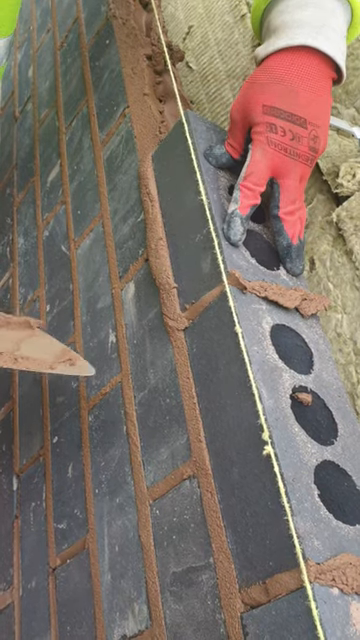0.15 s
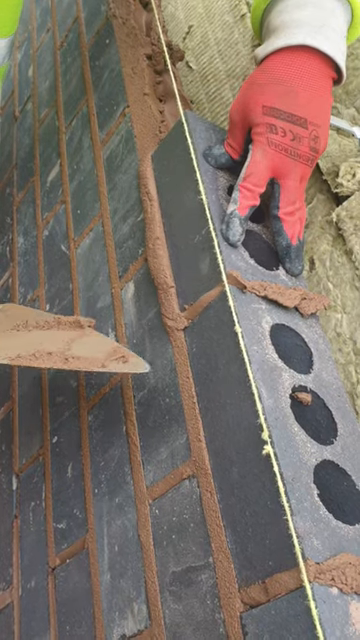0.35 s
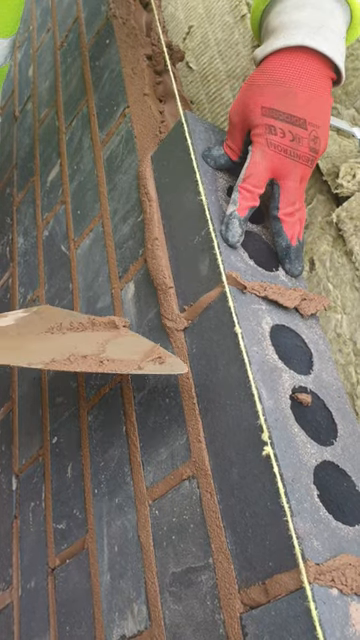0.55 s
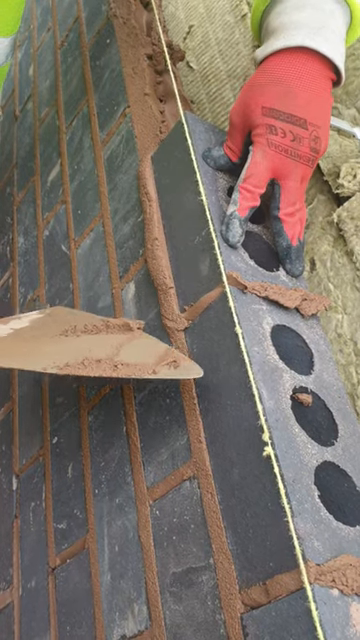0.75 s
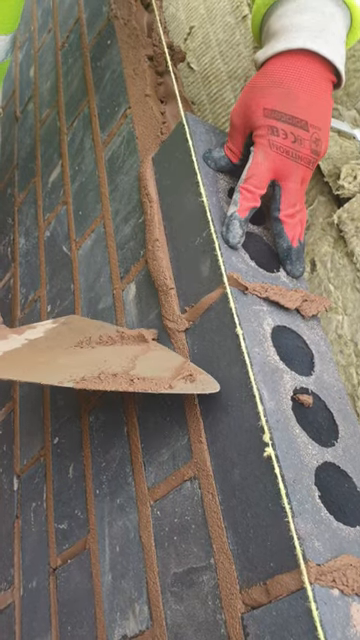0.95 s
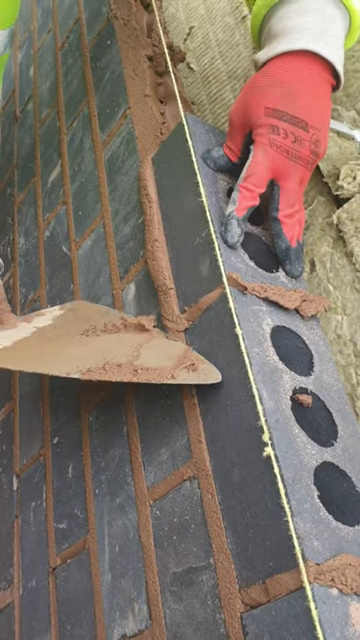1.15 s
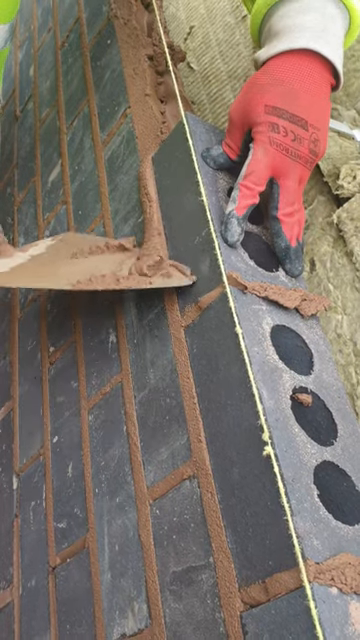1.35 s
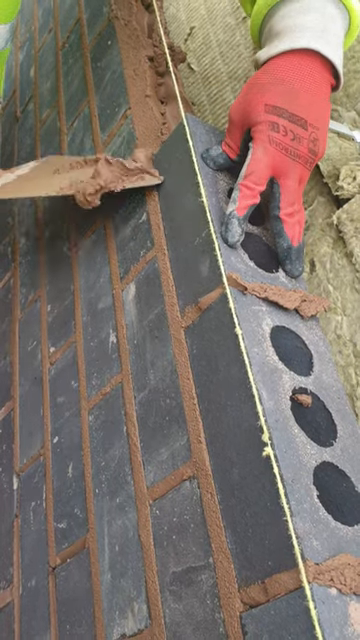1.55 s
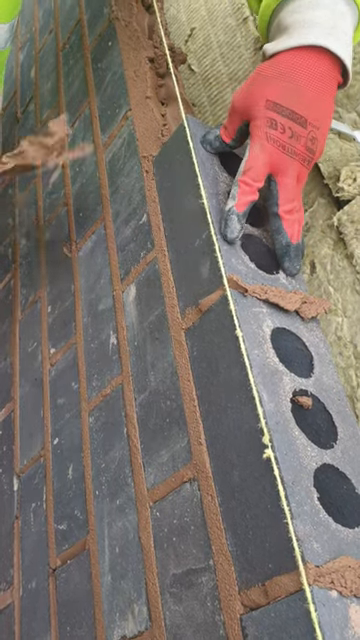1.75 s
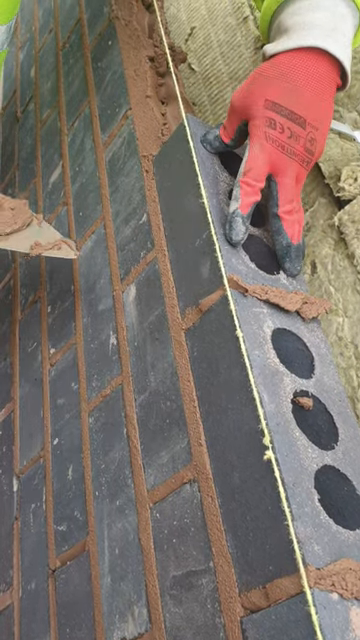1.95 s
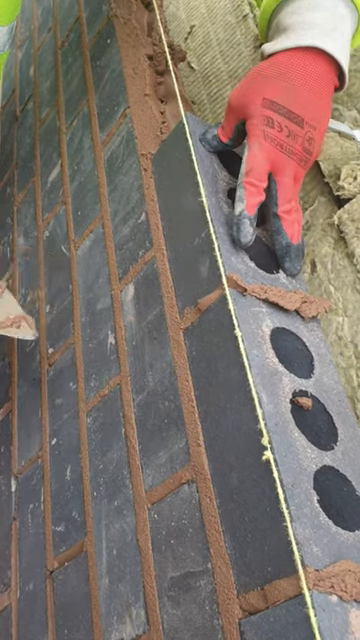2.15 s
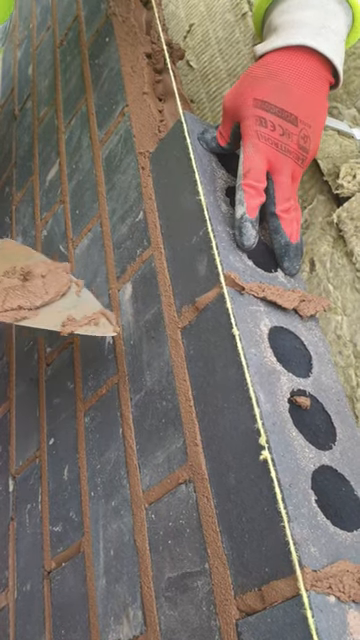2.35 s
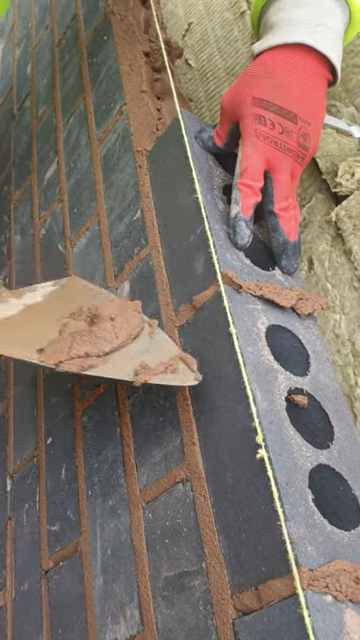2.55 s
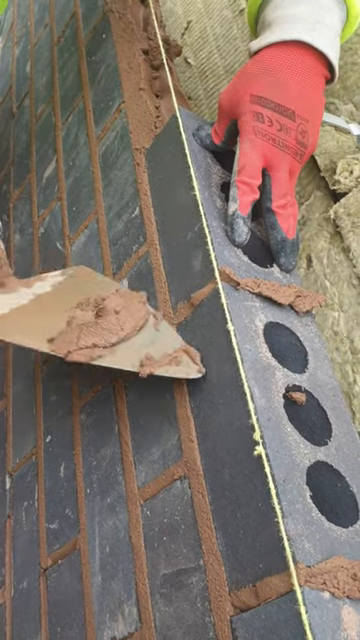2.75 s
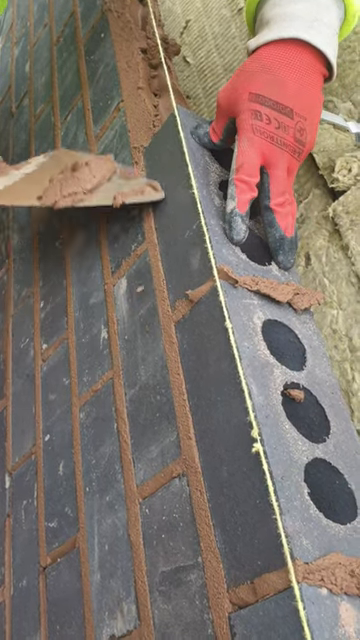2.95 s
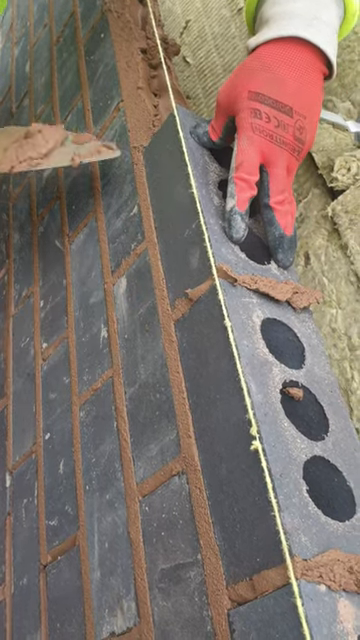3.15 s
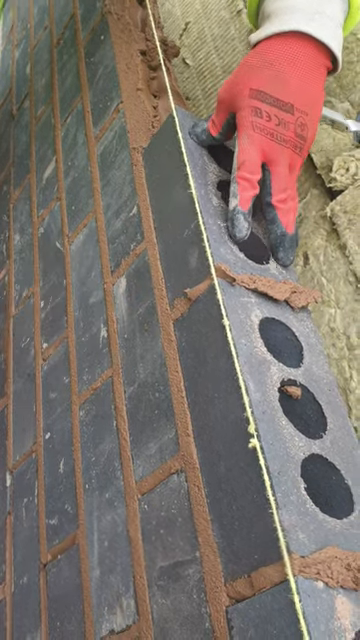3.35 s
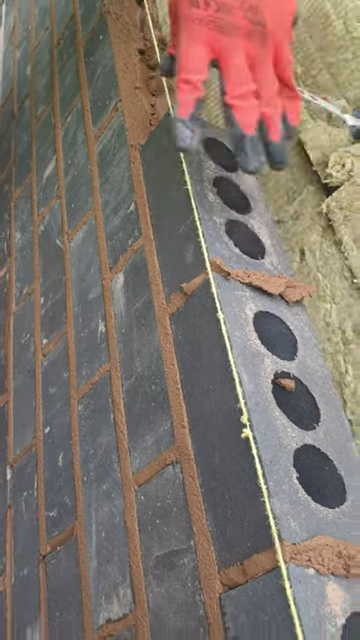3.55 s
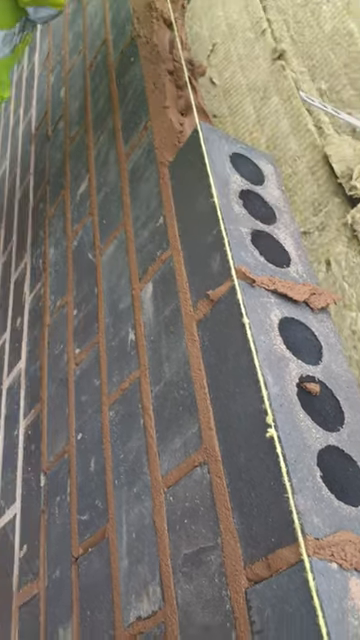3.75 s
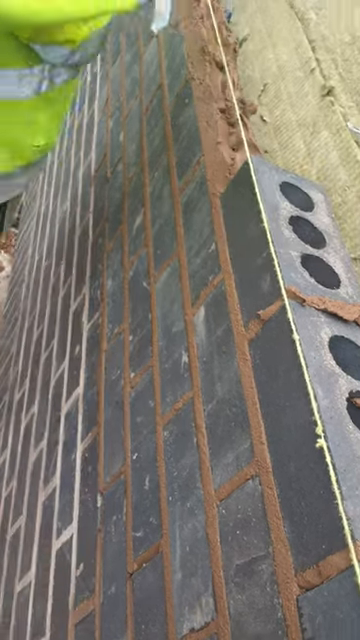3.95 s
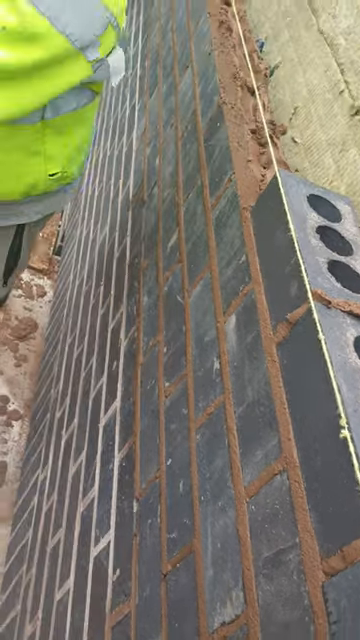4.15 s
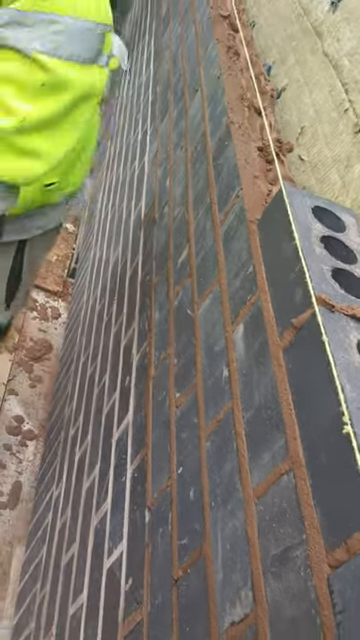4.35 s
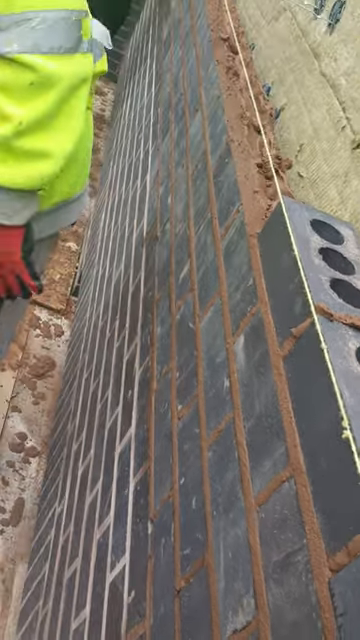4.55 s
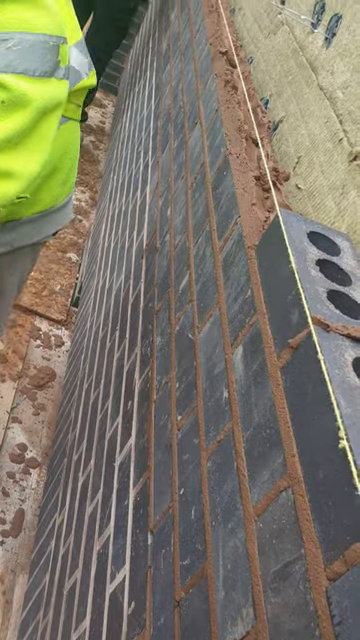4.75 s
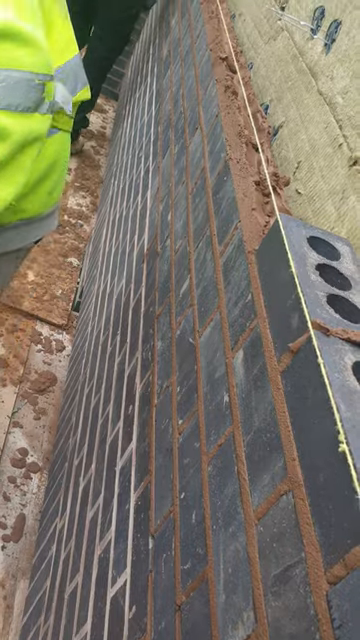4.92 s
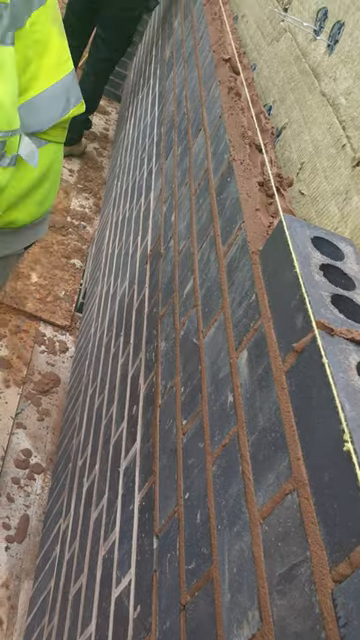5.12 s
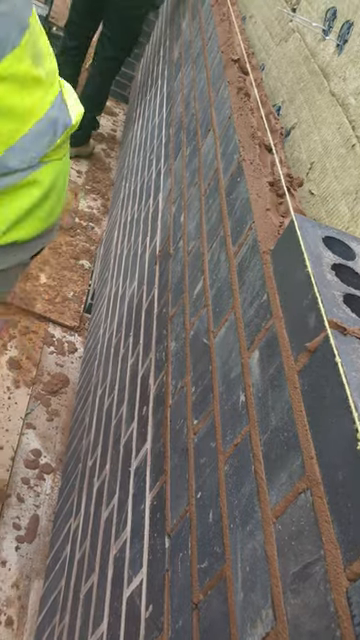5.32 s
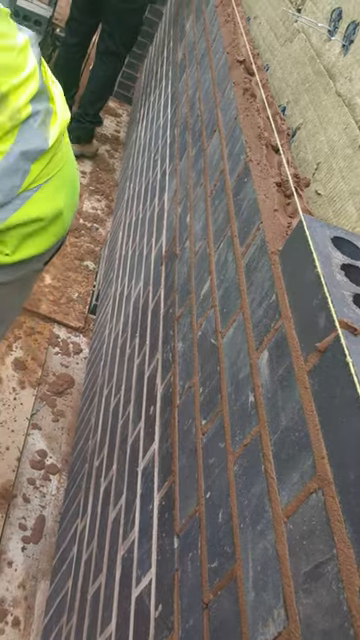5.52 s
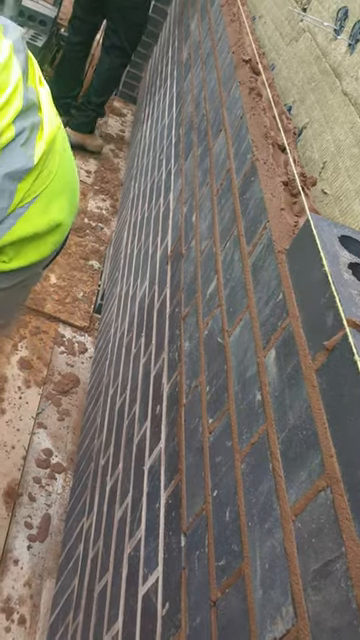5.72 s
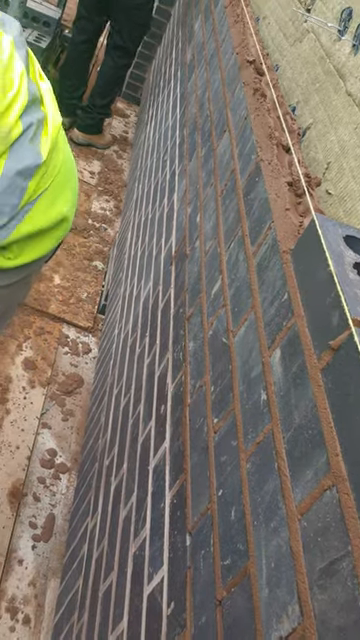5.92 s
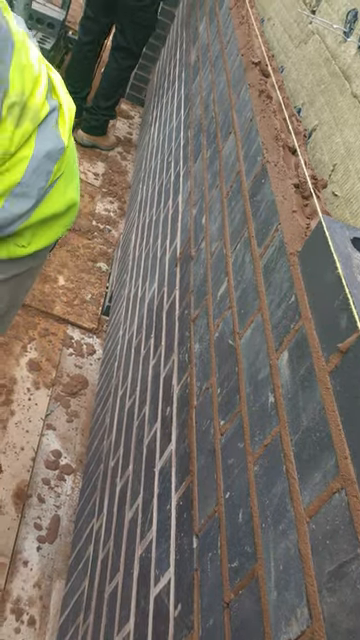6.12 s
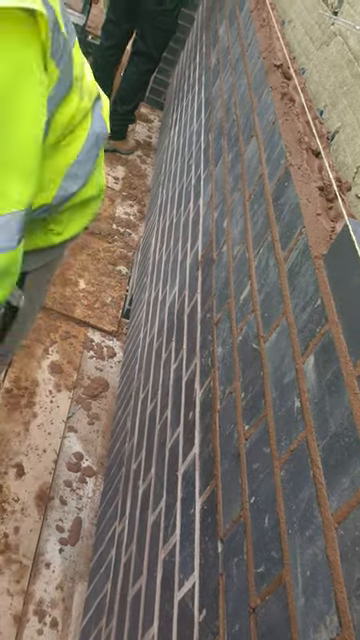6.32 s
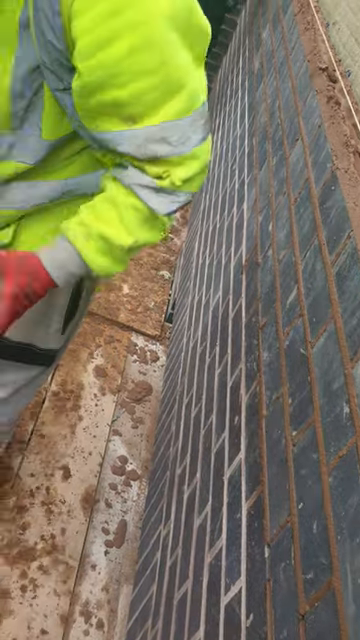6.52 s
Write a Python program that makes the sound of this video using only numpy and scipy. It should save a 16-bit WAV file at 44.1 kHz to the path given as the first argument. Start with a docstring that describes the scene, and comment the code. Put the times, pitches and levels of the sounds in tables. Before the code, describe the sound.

Close bricklaying: a dull knock, wet sandy smears, two bright gritty blade scrapes, then small taps, rustling clothes and boot scuffs over machinery rumble.

```python
"""Cutting mortar with a trowel

A bricklayer cuts squeezed-out mortar off a wall with a steel trowel, heard from close by.
The blade knocks, catches, smears wet mortar and scrapes twice along the brick: shaped noise and resonances.
Crumbs tap with short rings; cloth, grit and boots are shaped noise; squeaks and squeals are unsteady tones.
Site machinery rumbles behind with three low engine notes and filtered noise."""
import sys
import numpy as np
from scipy import signal
from scipy.fft import rfft, irfft
from scipy.io import wavfile
from scipy.ndimage import uniform_filter1d

SR = 44100
rng = np.random.default_rng(int(sys.argv[2]) if len(sys.argv) > 2 else 0)


def to_wav(s):
    """Save 16-bit WAV."""
    ch = np.atleast_2d(s).T  # columns
    pcm = np.round(np.clip(ch, -1, 1) * 32767)  # PCM
    wavfile.write(sys.argv[1], SR, pcm.astype(np.int16))


N = 290178
TIME = np.arange(N) / SR
SHORT_TIME = np.arange(SR // 4) / SR  # a quarter second, for single hits


def amp(db):
    """Turns decibels into a gain."""
    return 10 ** (np.asarray(db) / 20)


def unit(x):
    """Scales a sound to rms 1."""
    return x / np.sqrt(np.mean(x ** 2) + 1e-20)


def add(mix, start, sound):
    """Mixes a sound in at a start time in seconds."""
    part = mix[max(round(start * SR), 0):][:len(sound)]
    part += sound[:len(part)]


def colour(x, points, size=8192):
    """Filters one or two channels to the given (Hz, dB) outline, with no sound ahead of its cause."""
    hz, db = np.transpose(points)
    bins_hz = abs(np.fft.fftfreq(size, 1 / SR))
    outline_db = np.interp(np.log(bins_hz + 1), np.log(hz), db)
    log_gain = np.log(amp(outline_db))
    # minimum phase
    taps = np.fft.ifft(np.exp(np.conj(signal.hilbert(log_gain)))).real[:size // 2]
    return signal.oaconvolve(x, np.array(taps, ndmin=x.ndim), axes=-1)[..., :x.shape[-1]]


def wander(rate):
    """Smooth random curve of rms 1 that changes about rate times a second."""
    hz = np.fft.rfftfreq(N, 1 / SR)
    slow = rfft(rng.standard_normal(N)) * np.exp(-(hz / rate) ** 2)
    return unit(irfft(slow, N))


def grains(per_s, spread_db, smooth, likeness=0.38):
    """Sand grains crack: uneven clicks over a finer bed, each radiating its own way, so the ports differ."""
    size = amp(spread_db * np.minimum(rng.exponential(1, N), 4))
    size = size * (rng.random(N) < per_s / SR)
    clicks = unit(size * rng.choice([-1, 1], (2, N)))
    left, other = clicks + smooth * rng.standard_normal((2, N))
    # long waves reach both ports alike
    other = signal.lfilter(*signal.butter(1, 450, "high", fs=SR), other)
    right = likeness * left + np.sqrt(1 - likeness ** 2) * other
    return unit(np.array([left, right]))


def burst(t60):
    """A dying crackle of peak size about 1; t60 is the time in seconds to fall by 60 dB."""
    return rng.uniform(-1.01, 1, len(SHORT_TIME)) * amp(-60 * SHORT_TIME / max(t60, .002))


def place(x, echo_db, t60, shade_db, lead_s=.0002):
    """Wall and boards scatter sound to each port; the right hears it later, its treble shaded."""
    ports = []
    for sound, delay in zip(np.broadcast_to(x, (2, N)), (0, round(lead_s * SR))):
        # sparse random echoes after the first half millisecond
        taps = burst(t60) * (rng.random(len(SHORT_TIME)) < .15) * (SHORT_TIME > .0005)
        taps *= amp(echo_db) / np.linalg.norm(taps)
        taps[delay] += 1  # direct sound
        ports.append(signal.oaconvolve(sound, taps / np.linalg.norm(taps))[:N])
    shade = [(2700, 0.003), (3500, shade_db), (8000, shade_db), (12000, 0)]
    return np.array([ports[0], colour(ports[1], shade)])


def stroke(start, top, end, build_db, ease_db):
    """Gain of one arch of pressure: the blade lands, bears down, eases off and lifts."""
    land_s, lift_s, arch_power = 0.0014, 0.01, 2.14
    before = np.clip((top - TIME) / max(top - start, .001), 0, 1)
    after = np.clip((TIME - top) / max(end - top, .001), 0, 1)
    landed = np.clip((TIME - start) / land_s, 0, 1)
    not_lifted = np.clip(1 - (TIME - end) / lift_s, 0, 1)
    return landed * not_lifted * amp(-build_db * before ** arch_power - ease_db * after ** arch_power)


def swells(rows):
    """Gain over time of movements that each swell and fade evenly."""
    gain = np.zeros(N)
    for start, length, db in rows:
        add(gain, start, amp(db) * np.hanning(round(length * SR)))
    return gain


# Low engine notes. Each row: pitch in Hz, relative level in dB.
ENGINE_NOTES = [(40, -8), (56.5, -10), (70.8, -5.5)]
# Tone colour of the low rumble. Each row: frequency in Hz, relative level in dB.
RUMBLE_COLOUR = [(15, -34), (30, -32), (42, 0), (62, 0), (80, -3), (100, -4.5), (114, -9.5), (132, -6.5),
                 (170, -22), (300, -31), (700, -79)]
# Tone colour of the site noise. Each row: frequency in Hz, relative level in dB.
SITE_COLOUR = [(60, -16), (180, 0), (260, 0.5), (345, 3), (450, -1.5), (600, -2.5), (900, -7.5),
               (1300, -9.5), (2100, -9), (3300, -14), (6000, -21), (9000, -25), (12000, -30), (16000, -25)]
# How loud the background is over time; it grows towards the end.
# Each row: time in seconds, relative level of the rumble in dB, relative level of the site noise in dB.
BACKGROUND_LEVELS = [(0, -34, -43), (0.5, -36.5, -47), (1.1, -34.5, -44.5), (1.9, -37.5, -49),
                     (2.5, -37, -51), (3.3, -37.5, -49.5), (4.0, -36.5, -47.5), (4.4, -39, -50.7),
                     (5.1, -37.0, -50), (5.5, -34.5, -46.3), (6.1, -33, -42.5), (6.58, -30.5, -41.5)]


def machinery():
    """Unsteady engine notes in a rumble nearly alike at both ports, under the diffuse noise of the site."""
    notes = np.zeros(N)
    for hz, db in ENGINE_NOTES:
        unsteady_hz = hz * (1 + 0.01206 * wander(3.35))
        notes += amp(db) * np.sqrt(2) * np.sin(2 * np.pi * np.cumsum(unsteady_hz) / SR)
    roar = rng.standard_normal(N) + amp(-15.5) * rng.standard_normal((2, N))
    roar = unit(colour(roar, RUMBLE_COLOUR))
    times, rumble_db, site_db = np.transpose(BACKGROUND_LEVELS)
    rumble = amp(-2.0) * notes + amp(-2.5) * roar
    rumble = rumble * amp(-3 + np.interp(TIME, times, rumble_db))
    # site noise: a part shared by the ports and a part that sets them apart
    common = colour(rng.standard_normal(N), [(300, 1.0), (1000, 0.5), (2500, -2.5)])
    apart = colour(rng.standard_normal(N), [(100, -19), (350, -25.5), (1000, -8.0), (2500, -7)])
    left = colour(common + apart, SITE_COLOUR)
    right = colour(common - apart, SITE_COLOUR)
    right = colour(right, [(2700, -1.0), (3400, -12.0), (8000, -9.5), (12000, -0.5)])
    right = np.roll(right, 16)  # lags by 16 samples
    site_gain = amp(-1 + np.interp(TIME, times, site_db) + 0.23 * wander(7.4))
    return rumble + np.array([left, right]) / left.std() * site_gain


# Dull knocks on the wall and the boards.
# Each row: start in seconds, relative level in dB, pitch in Hz, time to die by 60 dB in seconds,
# level of the click against the thud in dB (before a small fixed boost of the thud).
KNOCKS_HEARD = [(0.1898, -10, 390, 0.024, -2.5), (0.8272, -36, 290, 0.21, -8),
                (1.539, -32, 238, 0.045, -10), (1.936, -27, 263, 0.075, -3), (3.882, -25, 280, 0.038, -13),
                (3.889, -26, 323, 0.073, -7), (5.986, -32, 485, 0.075, -12)]


def knocks():
    """A heavily damped low tone and its overtone, with a click at the contact."""
    out = np.zeros(N)
    click_colour = [(150, -20), (700, 13.5), (1300, -1.5), (2500, -0.5), (3500, -20), (12000, -21)]
    for start, db, hz, t60, click_db in KNOCKS_HEARD:
        turn = 2 * np.pi * hz * SHORT_TIME
        tones = np.sin(turn) + amp(-14) * np.sin(2.2 * turn)
        soft_start = 1 - np.exp(-SHORT_TIME / 0.0006)
        thud = tones * amp(-60 * SHORT_TIME / t60) * soft_start
        click = colour(burst(0.071), click_colour)
        add(out, start, amp(db) * (1.25 * thud + amp(click_db) * click))
    return place(out, echo_db=-7.5, t60=0.14, shade_db=-7)


# Tone colours of the blade in mortar. Each row: frequency in Hz, relative level in dB.
WET_SAND_COLOUR = [(1500, -29), (2600, 4.5), (4000, 2), (6000, 2.5), (8000, 1.5), (11000, -3.5),
                   (16000, -11)]
SQUELCH_COLOUR = [(400, -4), (1000, -5), (1400, -9.5), (1900, 1), (2600, -1), (3200, -12.5), (4500, -13.5)]
PUSH_COLOUR = [(80, -24), (170, -3.5), (290, 5.5), (450, 1.5), (750, -5), (1100, -8.5), (2000, -22.5)]
SWISH_SAND_COLOUR = [(1500, -21), (2600, -2), (4000, -4), (6000, -1.5), (8000, 3), (11000, 1.5), (16000, 4)]
SWISH_BODY_COLOUR = [(300, -12), (900, -2.5), (1500, -6), (2200, 4), (3500, -12), (6000, -22)]
# The blade sliding in wet mortar. Each row: start, hardest push and end in seconds,
# then the relative levels in dB of sand hiss, squelch and dull push on the wall.
SMEAR_STROKES = [(0.209, 0.32, 0.41, -38, -39.5, -32), (0.828, .89, 1, -31.5, -35.5, -41.5),
                 (1.933, 1.978, 2.014, -34.5, -38, -39.5), (2.01, 2.038, 2.11, -41, -49, -60),
                 (2.092, 2.116, 2.182, -44.5, -46, -47)]
# A quick swish of the blade further off. Each row: start, fastest moment and end in seconds,
# then the relative levels in dB of sand hiss and body. A row that ends before it starts stays silent.
SWISH_STROKES = [(4.549, 4.572, 4.594, -31.5, -36.5), (4.598, 4.64, 4.46, -47, -58),
                 (5.016, 5.028, 4.6, -50, -51)]


def smear(strokes, build_db, ease_db, sand, body, hiss_db, body_db, clump_db):
    """Wet mortar parts in clumps: fine sand hiss above a soft body."""
    clumps = amp(clump_db * wander(140))
    hiss = amp(hiss_db) * unit(colour(grains(7000, 0.93, 0.89) * clumps, sand))
    soft = grains(2000, 1.5, 0.65, likeness=0.83) * clumps
    squelch = amp(body_db) * unit(colour(soft, body))
    out = np.zeros((2, N))
    for start, top, end, sand_db, wet_db, *_ in strokes:
        pressure = stroke(start, top, end, build_db, ease_db)
        out += (amp(sand_db) * hiss + amp(wet_db) * squelch) * pressure
    return out


def mortar():
    """The blade smears wet mortar, pushing dully on the wall; later it swishes once, further off."""
    wet = smear(SMEAR_STROKES, 5.5, 16.5, WET_SAND_COLOUR, SQUELCH_COLOUR,
                hiss_db=-2.0, body_db=-1.0, clump_db=2.0)
    # the mortar gives way, so the push is strongest on landing
    sag_db_per_s = 79  # average over a stroke
    force = np.zeros(N)
    for start, _, end, _, _, push_db in SMEAR_STROKES:
        force += amp(push_db) * stroke(start, start, end, 0, sag_db_per_s * (end - start))
    push = amp(-2.5) * unit(colour(grains(700, 4.5, 0.67, likeness=0.85), PUSH_COLOUR)) * force
    swish = smear(SWISH_STROKES, 8, 17, SWISH_SAND_COLOUR, SWISH_BODY_COLOUR,
                  hiss_db=0.1, body_db=1.0, clump_db=0.5)
    near = place(wet + push, echo_db=-6.0, t60=0.035, shade_db=-7.5)
    return near + place(swish, echo_db=0.5, t60=0.15, shade_db=-4.0)


def sing(hz):
    """One note of rubbing parts, unsteady in pitch and loudness."""
    jitter = unit(uniform_filter1d(rng.standard_normal(N), size=120))
    unsteady_hz = hz * (1 + 0.0118 * jitter)
    return (1 + 0.28 * jitter) * np.sin(2 * np.pi * np.cumsum(unsteady_hz) / SR)


# Faint far-off squeals. Each row: start in seconds, length in seconds, pitch in Hz, level in dB.
FAR_SQUEALS = [(0.564, 0.14, 1664, -52), (.59, 0.15, 835, -53.5), (.68, 0.19, 990, -56),
               (4.817, 0.19, 1007, -61.5)]
# Something on the scaffold squeaks under the shifting weight.
# Each row: start in seconds, length in seconds, lowest note's level in dB, upper notes' level in dB.
SCAFFOLD_SQUEAKS = [(5.869, 0.17, -44.5, -44.5), (5.927, 0.041, -34, -51), (6.019, 0.027, -45.5, -41.5)]
# Notes of the squeaking part, lowest first. Each row: pitch in Hz, relative level in dB.
SQUEAKING_PART = [(2700, 2), (4170, 1), (6330, -17), (9200, -9), (9900, -12)]


def squeaks():
    """A rubbing part nearby sings on several notes at once; those far off on one each."""
    low = swells([(start, length, db) for start, length, db, _ in SCAFFOLD_SQUEAKS])
    upper = swells([(start, length, db) for start, length, _, db in SCAFFOLD_SQUEAKS])
    out = np.zeros(N)
    for k, (hz, db) in enumerate(SQUEAKING_PART):
        out += amp(db) * (upper if k else low) * sing(hz)
    for start, length, hz, db in FAR_SQUEALS:
        out += swells([(start, length, db)]) * sing(hz)
    return place(out, echo_db=-12, t60=0.098, shade_db=-5.5)


# Dry ticks of grit and clothing. Each row: start in seconds, relative level in dB.
GRIT_TICKS = [(0.671, -39), (3.9879, -36.5), (5.017, -37.5), (5.692, -35), (6.0255, -37), (6.2343, -28),
              (6.2647, -35), (6.4092, -37.5)]
# Glove and jacket rubbing. Each row: start in seconds, length in seconds, relative level in dB.
CLOTH_RUSTLES = [(1.79, 0.099, -57.5), (1.88, 0.062, -52), (3.35, 0.33, -46), (3.67, 0.13, -51.5),
                 (3.91, 0.11, -55.5), (4.1, .12, -55), (4.86, 0.076, -59.5), (5.45, 0.22, -53),
                 (5.66, 0.16, -50.5), (5.83, 0.29, -47.5)]
# Boots scuffing grit on the boards. Each row: start in seconds, length in seconds, level in dB.
BOOT_SCUFFS = [(4.028, 0.051, -42.5), (4.107, 0.099, -43), (5.909, 0.12, -36.5)]
# Tone colours of cloth and of boots. Each row: frequency in Hz, relative level in dB.
CLOTH_COLOUR = [(300, -4), (1000, 2), (2500, 9), (4500, 6), (6300, 4.5), (9000, 2), (12000, 0), (16000, -4)]
SCUFF_COLOUR = [(100, 3), (300, 6.5), (500, 2), (1100, 2), (2000, -13), (4000, -13.5), (9000, -32)]


def movements():
    """Cloth rubs, grit ticks and boots scuff as the bricklayer moves."""
    rubbing = grains(2500, 4.5, 1.0) * amp(3.5 * wander(47))
    rustles = unit(colour(rubbing, CLOTH_COLOUR)) * swells(CLOTH_RUSTLES)
    ticks = np.zeros(N)
    for start, db in GRIT_TICKS:
        add(ticks, start, amp(db) * burst(0.04))
    ticks = colour(ticks, [(500, -7), (3000, -0.5), (6000, 2.5), (8500, 5.5), (11000, -3.5), (16000, -6)])
    scuffs = unit(colour(grains(900, 3.1, 0.32), SCUFF_COLOUR)) * swells(BOOT_SCUFFS)
    return place(rustles + ticks + scuffs, echo_db=-7.5, t60=0.024, shade_db=-5)


# Tone colour of crushed sand, for the catches and the scrapes.
# Each row: frequency in Hz, relative level in dB.
SAND_COLOUR = [(1500, -18), (3000, -12.5), (4500, -1.5), (5800, 0.5), (8000, 3), (11000, 2.5), (16000, -3)]
# The steel edge catches and skips in an even run of slips. Each row: start in seconds,
# number of slips, gap between slips in seconds, relative levels of the first and last slip in dB.
EDGE_CATCHES = [(0.827, 1, 0, -20, -22), (1.1635, 2, .0042, -10, -21.5), (1.187, 4, .022, -12.5, -25),
                (1.307, 1, 0, -10, -11), (1.4468, 2, .004, -2.5, -16), (1.616, 1, 0, -15, -16.5),
                (1.936, 1, 0, -29, -24), (2.762, 3, .0235, -29, -19.5), (2.864, 1, 0, -21, -13),
                (2.897, 2, .0105, -13, -11), (2.951, 4, .008, -7, -18)]


def catches():
    """Hard slips of the edge: runs of short bright bursts of crushed sand."""
    out = np.zeros(N)
    for start, count, gap, first_db, last_db in EDGE_CATCHES:
        for k, db in enumerate(np.linspace(first_db, last_db, round(count))):
            add(out, start + k * gap, amp(db) * burst(t60=0.028))
    return place(amp(-4.5) * colour(out, SAND_COLOUR), echo_db=-8.5, t60=0.033, shade_db=-17)


# Ring of a tapped brick. Each row: pitch in Hz, relative level in dB, time to die by 60 dB in seconds.
BRICK_RING = [(710, -16.5, 0.088), (1036, -7.5, 0.061), (1192, 5, 0.027), (1800, -1.5, 0.024),
              (2320, 0.5, 0.029), (2990, -17, 0.025)]
# Crumbs of mortar and fingertips tapping brick. Each row: start in seconds, relative level in dB,
# relative treble in dB, pitch as a multiple of the brick's ring.
BRICK_TAPS = [(1.162, -23.5, 7.5, 0.96), (1.537, -27.5, 13, 1.06), (1.751, -23.5, 7, 0.99),
              (2.765, -25, -3, 0.83), (3.463, -22.5, 6.5, 1), (3.558, -25, 8, 0.84),
              (3.581, -24.5, 3, 1.03), (3.701, -27, 4, 0.96), (6.025, -31, 11, 1)]


def taps():
    """Small hard contacts ring the brick briefly, with a crack of noise."""
    out = np.zeros(N)
    crack_colour = [(150, 7.5), (1500, 8.0), (2600, 1.5), (5000, 0.5), (12000, -18.5)]
    for start, db, treble_db, pitch in BRICK_TAPS:
        ring = np.zeros(len(SHORT_TIME))
        for hz, ring_db, t60 in BRICK_RING:
            tap_hz = hz * pitch * rng.uniform(1.0, 1.03)
            ring += amp(ring_db - 60 * SHORT_TIME / t60) * np.sin(2 * np.pi * tap_hz * SHORT_TIME)
        crack = colour(burst(0.026), crack_colour)
        add(out, start, amp(db) * (ring / abs(ring).max() + amp(treble_db - 8.5) * crack))
    return amp(1.5) * place(out, echo_db=0, t60=0.038, shade_db=-8.0)


# The blade dragged along the brick. Each row: start, hardest push and end in seconds,
# relative levels of sand hiss and grinding in dB, build-up of pressure in dB, easing off in dB.
SCRAPE_STROKES = [(1.208, 1.455, 1.766, -24, -30, 9.5, 26.5), (2.785, 2.935, 3.137, -21, -30, 18, 20.5)]
# Tone colour of the grinding rasp. Each row: frequency in Hz, relative level in dB.
GRIND_COLOUR = [(80, -24.5), (200, -5.5), (450, -2.5), (1000, -2), (2000, -9), (3500, 0), (7000, -23.5)]
# Resonances of the blade pressed on the brick; the grip shifts their weights.
# Each row: pitch in Hz, width in Hz, relative level in dB in the first stroke, then in the second.
BLADE_RESONANCES = [(667, 105, -9.5, -3), (840, 76, 2, -2), (1180, 75, -3.5, -3.5), (1710, 157, -6.5, -6),
                    (1850, 190, -4, -9), (2210, 190, -1.5, -12), (2536, 81.5, 3, -0.5)]
# Where along the stroke each blade resonance is excited most, lowest resonance first.
# Each entry: share of the stroke, from 0 to 1.
BEST_SPOTS = [0.41, 0.083, 0.23, 0.38, 0.26, 0.45, 0.12]


def scrapes():
    """Steel sticks and slips over brick: each slip crushes sand and shakes the blade's resonances."""
    ring_follows, rasp_follows = 0.72, 0.91  # dB of each for every dB of pressure
    off_spot_db = 12.5  # loss over a whole stroke's distance from the best spot
    chatter_hz = 110 * (1 + 0.2873 * wander(67.4))  # uneven slips
    chatter = np.sin(2 * np.pi * np.cumsum(chatter_hz) / SR)
    slip = amp(2.0 * chatter + 0.64 * wander(380) + 1.0 * wander(35))
    crushed = grains(4000, 4.2, 0.26, likeness=0.49) * slip
    sand = amp(-2.5) * unit(colour(crushed, SAND_COLOUR))
    push = grains(2500, 1.64, 0.53, likeness=0.79) * slip
    rasp = amp(-4.5) * unit(colour(push, GRIND_COLOUR))
    modes = []
    for hz, width, *_ in BLADE_RESONANCES:
        mode = signal.lfilter(*signal.iirpeak(hz, hz / width, SR), push)
        modes.append(mode * amp(1.16 * wander(8.5)))
    out = np.zeros((2, N))
    for k, (start, top, end, hiss_db, grind_db, build_db, ease_db) in enumerate(SCRAPE_STROKES):
        pressure = stroke(start, top, end, build_db, ease_db)
        on = pressure > 0
        # the point of contact travels along the edge, so the resonances swell and fade in turn
        travel = (TIME[on] - start) / (end - start)
        ring = 0
        for mode, spot, (_, _, *stroke_db) in zip(modes, BEST_SPOTS, BLADE_RESONANCES):
            ring = ring + amp(stroke_db[k] - off_spot_db * abs(travel - spot)) * mode[:, on]
        out[:, on] += amp(grind_db - 5.0) * unit(ring) * pressure[on] ** ring_follows
        out += amp(hiss_db) * sand * pressure
        out += amp(grind_db) * rasp * pressure ** rasp_follows
    return place(out, echo_db=-5.0, t60=0.041, shade_db=-2.0, lead_s=.00016)


def scene():
    """Trowel work in front, the bricklayer beside it, machinery behind."""
    return scrapes() + catches() + mortar() + knocks() + taps() + movements() + squeaks() + machinery()


# Colour of the two microphone ports. Each row: frequency in Hz, level in dB.
LEFT_COLOUR = [(300, 0.5), (1200, 1.5), (2400, -1.5), (3800, 0), (5100, 4.5), (5800, 14), (6500, 13.5),
               (7300, 2), (10500, 3.5), (13000, -7), (16000, -15.5)]
RIGHT_COLOUR = [(300, 0), (1200, 0), (1900, 7), (2650, 6.5), (3400, -6), (4500, 1.5), (6300, 8.5),
                (7300, -2.5), (8200, -26), (9300, -3), (11200, -2), (13000, -9), (16000, -18.5)]


def record(dry):
    """Each microphone port has its own resonances; then a steep filter removes the highest treble."""
    heard = np.array([colour(dry[0], LEFT_COLOUR), colour(dry[1], RIGHT_COLOUR)])
    low_pass = signal.firwin(511, 15900, window=("kaiser", 9), fs=SR)  # cutoff in Hz
    return signal.oaconvolve(heard, low_pass[None], "same")


dry = scene()
out = record(dry)
to_wav(out)
```